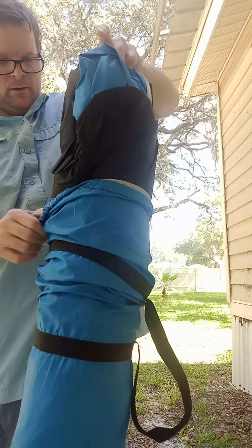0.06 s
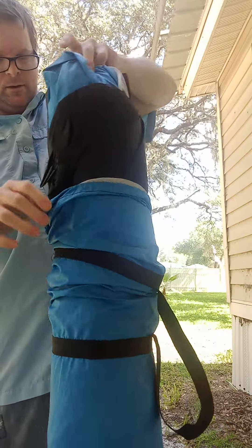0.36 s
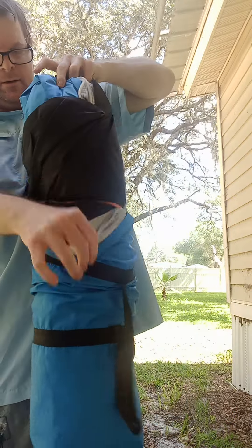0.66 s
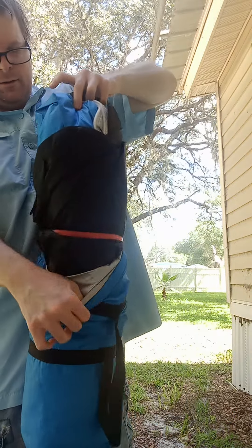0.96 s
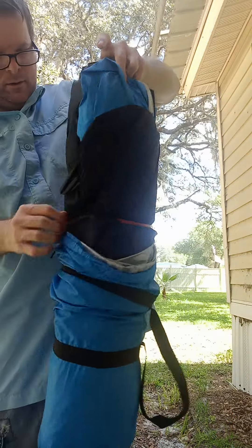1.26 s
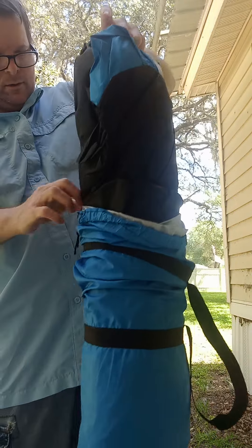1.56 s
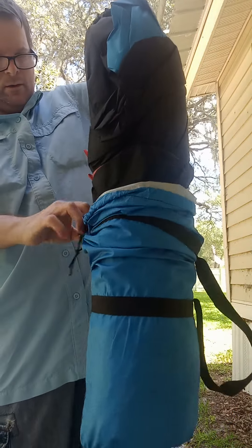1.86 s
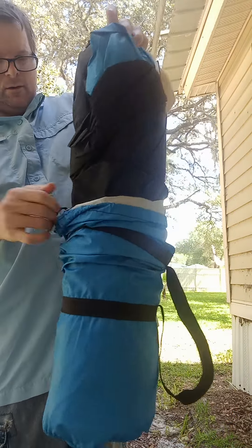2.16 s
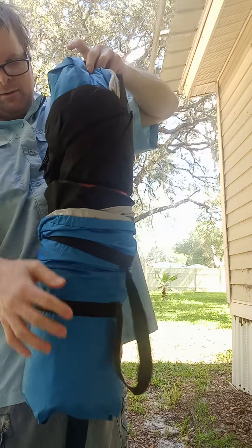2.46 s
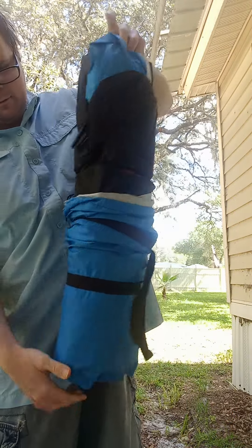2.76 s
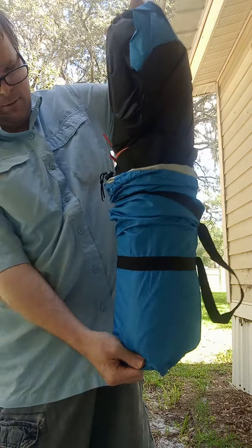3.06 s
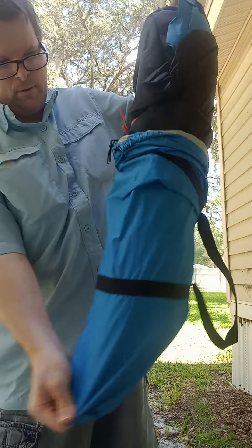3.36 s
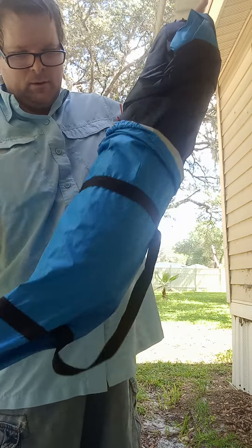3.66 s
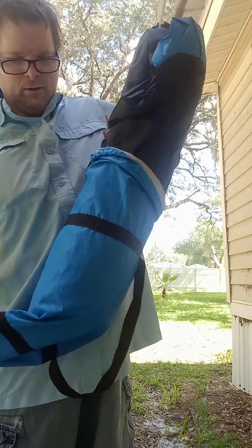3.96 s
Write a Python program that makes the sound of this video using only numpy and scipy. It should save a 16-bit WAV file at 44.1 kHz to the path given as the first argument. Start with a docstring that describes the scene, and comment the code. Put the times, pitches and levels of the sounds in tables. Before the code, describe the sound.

A nylon bag hisses and scrapes off a packed tent, close by outdoors, in short tugs with clicking creases through the first 1.2 seconds. The cloth cracks taut at 1.7, and a palm pats and brushes it at 2.5. The longest, loudest pull runs from 3.1 to 3.4, followed by lighter rustling until 4. Behind, a low engine drone speeds up and swells from about 1.8 over faint street rumble.

```python
"""Nylon hisses and scrapes in short slides as a carry bag is tugged off a packed tent outdoors.
Threads slip and catch, creases snap, hands pat the bag; it jerks taut once, a palm brushes down it,
and a long pull drags it loose, all answered by a short slap off the house wall.
Behind it an engine, probably a truck down the street, drones through its exhaust and gathers speed
over street rumble and faint outdoor air with a thin high hum and microphone hiss."""
import sys
import numpy as np
from scipy import signal
from scipy.fft import rfft, irfft, next_fast_len
from scipy.io import wavfile
from scipy.ndimage import map_coordinates

SR = 44100
rng = np.random.default_rng(int(sys.argv[2]) if len(sys.argv) > 2 else 0)


def put_to_file(sound):
    """Save the sound as 16-bit audio at rate SR, in the file named by the first command-line argument."""
    columns = np.atleast_2d(sound).T  # one column per channel
    safe = np.clip(columns, -1, 1)
    whole_steps = np.round(safe * 32767)
    wavfile.write(sys.argv[1], SR, whole_steps.astype(np.int16))


N = 176400

# fader moves of the bag sliding on the tent: time_s, hiss_db, scrape_db
SLIDE_LEVELS = [(0.0, -51, -74), (0.075, -57.5, -84), (0.11, -51, -62.5), (0.22, -46.5, -57.5),
                (0.28, -40, -50), (0.35, -43.5, -53.5), (0.42, -42.5, -56), (0.56, -41, -49),
                (0.62, -51, -53.5), (0.73, -42.5, -51), (0.8, -58, -63.5), (0.86, -48.5, -53),
                (0.93, -43, -54), (0.99, -51, -59.5), (1.06, -71, -81), (1.1, -51.5, -63),
                (1.15, -47.5, -59), (1.18, -61.5, -78), (1.22, -49, -63), (1.29, -68, -72), (1.4, -69, -67),
                (1.44, -57.5, -82), (1.52, -60, -72), (1.6, -51, -61), (1.68, -52.5, -61), (1.74, -42, -50),
                (1.79, -39, -51), (1.84, -61.5, -60.5), (1.91, -49.5, -65), (1.94, -56, -60),
                (2.0, -49.5, -62), (2.045, -46.5, -61), (2.072, -65.5, -72), (2.15, -70.5, -79),
                (2.31, -72, -95), (2.4, -57.5, -64.5), (2.72, -67, -67), (2.78, -56.5, -57.5),
                (2.86, -46, -53), (2.96, -52, -53.5), (3.085, -44.5, -47.5), (3.102, -35, -42.5),
                (3.19, -36, -43.5), (3.32, -32, -38.5), (3.38, -38.5, -48), (3.43, -48, -52.5),
                (3.49, -47.5, -52), (3.55, -41.5, -50), (3.61, -46.5, -52), (3.68, -51, -55.5),
                (3.77, -48.5, -50), (3.87, -49, -54.5), (3.95, -45, -47.5), (4.0, -52, -50.5)]
# high shelf riding on the hiss: time_s, gain_db
HISS_SHELF = [(0, -0.5), (.28, 0.5), (.45, -1.5), (.56, -3), (.68, -6), (.93, 0.5), (1.13, -0.5), (2.03, 0),
              (2.95, -3), (3.13, 0), (3.7, -.5)]
# tone curves of the cloth: freq_hz, gain_db
HISS_EQ = [(1200, -21), (2600, -3.5), (3300, -1.5), (5500, -3), (7400, -1), (8400, -8), (12000, -0.5),
           (15500, -6.5)]  # bright top of the slide
SCRAPE_EQ = [(150, -29), (270, -1), (480, -2.5), (900, -3.5), (1400, -3), (1800, -3.5), (2300, -7),
             (3000, -14), (6000, -28.5)]  # its lower scrape
BODY_EQ = [(100, -3.5), (170, -10), (270, 0), (330, -5.5), (420, -35), (800, -54)]  # broad body of the packed bag
RASP_EQ = [(1200, -43), (2000, 3), (2800, -1.5), (3600, -16), (6000, -8.5)]  # hard-pressed cloth
CRINKLE_EQ = [(400, -18), (1500, -0.5), (3000, 0), (7000, -4.5), (15000, -5)]  # tiny folds
CRACK_EQ = [(120, -8), (280, -3), (500, -8), (780, -26), (1050, 1.5), (1600, -2), (2500, 2), (7000, -2),
            (15000, -9.5)]  # cloth pulled taut
PALM_EQ = [(300, -0.5), (600, -3.5), (1150, -11), (1850, -1), (2200, -4), (2500, -5.5), (3200, -12),
           (3550, 2), (4200, -3), (7300, -1), (8400, -3.5), (15500, 0)]  # swish under the hand

# engine speed: time_s, firing_hz
ENGINE_SPEED = [(0, 62), (.25, 69.8), (.45, 69.6), (.7, 68.2), (1.08, 66.9), (1.31, 68.1), (1.49, 69.9),
                (1.83, 72.2), (2.05, 71.9), (2.32, 73.4), (2.55, 77.3), (2.72, 80), (3.33, 82.7),
                (3.45, 79.5), (3.52, 70.6), (3.65, 73.6), (3.85, 77), (4, 81)]
# engine load: time_s, firing_db, octave_db, lope_db
ENGINE_LOAD = [(0, -48, -68, -58), (.45, -46, -43.5, -45.5), (1.08, -39.5, -38, -49),
               (1.31, -43, -39.5, -46.5), (1.49, -49, -64, -51), (1.83, -33.5, -49.5, -39.5),
               (2.05, -34, -55.5, -39), (2.32, -28.5, -58, -41.5), (2.6, -27, -49, -43.5),
               (2.72, -22, -65, -42), (3.33, -21, -52, -40), (3.45, -21.5, -67, -42), (3.52, -30, -53, -37),
               (3.85, -28.5, -57, -43.5), (4, -29, -47, -41)]
# partials of the lope around the firing tone: multiple_of_cycle
LOPE_PARTIALS = [5, 7, 9, 10, 11, 13]
# their balance: gain_db
LOPE_MIX = [-4.5, 2.5, 0, -15, 0, -13.5]
# resonances of the exhaust: freq_hz, gain_db
EXHAUST_EQ = [(44, -16.5), (51, -2), (64, -16.5), (72, -5.5), (83, 3), (92, -12), (102, -2.5), (113, -22),
              (135, 6.5)]
# where the engine sits: time_s, left_minus_right_db
ENGINE_POSITION = [(0, 5), (1.5, 3), (2.3, 4.5), (4, 3)]
# tone curve of the street rumble: freq_hz, gain_db
STREET_EQ = [(25, -36), (42, -6.5), (62, 7.5), (90, 3), (115, 2.5), (170, -7.5), (300, -12.5), (420, -18.5),
             (700, -53)]
# tone curve of the outdoor air, its thin high hum and the microphone hiss: freq_hz, gain_db
AIR_AND_HISS_EQ = [(200, -4), (500, 1.5), (750, 0), (980, 2.5), (1200, -1), (1480, 2), (1660, 5),
                   (1950, -15), (2750, -27), (3150, -3), (3450, -16), (4000, -2.5), (5200, -13), (7200, -9),
                   (9000, -23), (12000, -8), (15000, -21)]

# creases snapping: start_s, level_db, centre_hz, width_ratio, t60_s
CREASE_SNAPS = [(0.0926, -35.5, 5000, 1.2, .014), (.287, -29, 1520, 0.41, 0.016),
                (0.3313, -28.5, 1710, 0.53, 0.02), (0.3947, -20.5, 4000, 2.2, .004),
                (0.4591, -15.5, 4960, 0.8, 0.0052), (0.6788, -28, 2200, 0.37, 0.01),
                (0.715, -25.5, 2080, 0.48, 0.0089), (0.7528, -24.5, 5600, 1.3, 0.012),
                (0.912, -30.5, 2660, 0.33, 0.0076), (1.0782, -39.5, 6500, 1.5, 0.067),
                (1.1892, -29.5, 12500, 0.56, 0.032), (1.1889, -34, 4430, 0.27, 0.018),
                (1.202, -36, 12200, .2, .015), (1.212, -34, 13500, 0.33, 0.022),
                (1.363, -38.5, 1500, 6.7, 0.038), (1.975, -35, 2430, 0.46, 0.0088),
                (2.756, -43, 7800, 1, 0.16), (3.006, -37, 4150, 0.26, 0.14),
                (3.0405, -29, 14200, 0.15, .012), (3.098, -23.5, 13800, 0.2, 0.034),
                (3.3158, -10.5, 5540, 0.23, 0.0059), (3.322, -16, 1500, 1, 0.015),
                (3.3415, -24, 2500, 1.2, 0.004), (3.609, -32, 10500, .5, .005),
                (3.694, -32, 1130, 0.45, 0.014), (3.733, -31, 3880, 0.71, 0.054),
                (3.753, -28, 8000, 2.1, 0.04), (3.767, -25, 12200, 0.2, 0.0088),
                (3.8078, -25, 6000, 1.7, 0.0049)]
# the weave zipping over a seam: start_s, length_s, pitch_hz, level_db
SEAM_ZIPS = [(0.128, 0.062, 610, -56.5), (3.769, 0.066, 4000, -47), (3.833, 0.044, 3900, -51)]
# hands patting the bag: start_s, level_db
HAND_PATS = [(1.349, -54), (2.486, -46), (3.234, -38.5)]
# the close-set hits of the one jerk: start_s, level_db
JERK_HITS = [(1.729, -35), (1.74, -22), (1.7438, -35)]
# modes of the stretched panel: pitch_hz, level_db, t60_s
PANEL_MODES = [(192, -11, 0.038), (285, -1.5, 0.024), (430, -17, 0.033)]

# how alike left and right are: freq_hz, correlation
STEREO_LIKENESS = [(60, 1), (290, 0.8), (640, 0.76), (1400, 0.5), (3100, 0), (15000, 0)]
# lean of the microphone pair: freq_hz, left_minus_right_db
MIC_BALANCE = [(60, -6), (140, -6.5), (280, -1), (780, -3), (1050, 1.5), (1800, 3), (2300, -1),
               (3300, -2.5), (7300, -8.5), (8200, -2), (9200, 1.5), (10300, -7), (12200, -10), (13500, 0),
               (15500, -6)]
# tone curve of both microphones: freq_hz, gain_db
MIC_EQ = [(7000, -0.5), (8300, -1), (10000, -2), (12000, 0), (14000, -4), (16000, -4.5)]


def amp(db):
    """Decibels to gain."""
    return 10 ** (np.asarray(db) / 20)


def unit_rms(x):
    """Scale to rms 1."""
    return x / np.sqrt(np.mean(x ** 2) + 1e-20)


def curve_at(points, hz):
    """Read a frequency curve on a log axis."""
    freqs, values = np.transpose(points)
    return np.interp(np.log(hz + 1), np.log(freqs + 1), values)


def automation(rows):
    """One lane, a value per sample, for each column after the time."""
    times, *lanes = np.transpose(rows)
    return [np.interp(np.arange(N) / SR, times, lane) for lane in lanes]


def wobble(per_s):
    """A smooth random curve with per_s knots a second."""
    return map_coordinates(rng.standard_normal(N // 100), [np.arange(N) * per_s / SR], mode="wrap")


def equalise(x, response):
    """Filter x by a gain given as a function of frequency."""
    size = next_fast_len(N + SR // 4)
    return irfft(rfft(x, size) * response(np.fft.rfftfreq(size, 1 / SR)), size)[..., :N]


def stereo_noise(eq, pair=None):
    """Shape two unrelated signals (white noise by default) to rms 1, narrow in the bass, wide on top."""
    def mid_side(hz):
        spread = np.arccos(np.clip(curve_at(STEREO_LIKENESS, hz), -1, 1)) / 2
        return amp(curve_at(eq, hz)) * [np.cos(spread), np.sin(spread)]
    pair = rng.standard_normal((2, N)) if pair is None else pair
    mid, side = equalise(pair, mid_side)
    return unit_rms(np.array([mid + side, mid - side]))


def resonate(x, hz, width):
    """One resonance that keeps the level of white noise; width is relative to its centre."""
    f = np.fft.rfftfreq(x.shape[-1], 1 / SR)
    gain = 1j * f / (hz * hz - f * f + 1j * f * hz * width)
    return irfft(rfft(x) * gain / np.sqrt(np.mean(np.abs(gain) ** 2)))


def decay(t, t60_s):
    """A tail that falls 60 dB in t60_s."""
    return np.exp(-np.log(1000) * t / t60_s)


def place(out, start_s, sound):
    """Mix a sound in at start_s."""
    part = out[:, round(start_s * SR):][:, :sound.shape[-1]]
    part += sound[..., :part.shape[1]]


def friction(eq, grain_db, catches_per_s=1500, spread_db=2.5):
    """Countless threads slip in a smooth wash, with sparser, larger catches as grain on top."""
    catches = rng.random(N) < catches_per_s / SR
    sizes = amp(spread_db * np.minimum(rng.exponential(size=N), 4))
    wash = rng.standard_normal((2, N))
    grain = unit_rms(catches * sizes * rng.standard_normal((2, N)))
    return stereo_noise(eq, wash + amp(grain_db) * grain)


def slide():
    """Nylon flutters as it drags over nylon: it rasps when pressed, and the packed bag rumbles along."""
    shelf_hz, firm_scrape_db, rasp_growth = 8000, -50, 1.22
    hiss_db, scrape_db = automation(SLIDE_LEVELS)
    shelf_db, = automation(HISS_SHELF)
    flutter_db = 1.5 * wobble(per_s=55)
    hiss = amp(hiss_db + 1 + flutter_db) * friction(HISS_EQ, grain_db=-11)
    hiss += (amp(shelf_db) - 1) * equalise(hiss, lambda hz: hz > shelf_hz)
    scrape = amp(-0.5) * friction(SCRAPE_EQ, grain_db=-6.5)
    body = amp(-6.5) * stereo_noise(BODY_EQ)
    rasp_db = -53 + rasp_growth * (scrape_db - firm_scrape_db) + 1.5 * wobble(per_s=29.74)
    rasp = amp(rasp_db) * friction(RASP_EQ, grain_db=-6.5)
    return hiss + rasp + amp(scrape_db + 0.76 * flutter_db) * (scrape + body)


def crinkles(folds_per_s=90):
    """Tiny creases fold at random, a fine crackle that rides the level of the hiss."""
    t = np.arange(SR // 100) / SR
    folds = (rng.random(N) < folds_per_s / SR) * rng.uniform(.3, 1, N)
    envelope = np.convolve(folds, decay(t, t60_s=0.0032))[:N]
    hiss_db, _ = automation(SLIDE_LEVELS)
    return amp(hiss_db - 9.5) * unit_rms(envelope * stereo_noise(CRINKLE_EQ))


def engine(cylinders=8, throb_s=2.073):
    """Only the lowest exhaust orders carry this far; one weak cylinder makes them throb once a cycle."""
    firing_hz, = automation(ENGINE_SPEED)
    firing_db, octave_db, lope_db = automation(ENGINE_LOAD)
    pan_db, = automation(ENGINE_POSITION)
    cycle = 2 * np.pi * np.cumsum(firing_hz) / SR / cylinders
    cycle -= cycle[round(throb_s * SR)]  # the partials line up here
    drone = amp(firing_db) * np.sin(cylinders * cycle) + amp(octave_db) * np.sin(2 * cylinders * cycle)
    for order, gain_db in zip(LOPE_PARTIALS, LOPE_MIX):
        exhaust_db = curve_at(EXHAUST_EQ, firing_hz * order / cylinders)
        drone -= amp(lope_db + gain_db + exhaust_db) * np.sin(order * cycle)
    return np.sqrt(2) * drone * amp(np.outer([.5, -.5], pan_db))


def street_and_air():
    """A wavering bed of street rumble and faint outdoor air with a thin high hum and microphone hiss."""
    rumble = amp(-46 + wobble(per_s=6.13)) * stereo_noise(STREET_EQ)
    air = amp(-64.5 + wobble(per_s=1.17)) * stereo_noise(AIR_AND_HISS_EQ)
    return rumble + air


def snaps(trim_db=-8):
    """Each crease buckles with one sharp, broadly tuned click and a short rustle."""
    out, t = np.zeros((2, N)), np.arange(4096) / SR
    click = amp(10.5) * (t == t[8])
    tail = amp(-19.5) * decay(t, t60_s=.07)
    for start_s, level_db, centre_hz, width, t60_s in CREASE_SNAPS:
        rustle = (decay(t, t60_s) + tail) * rng.standard_normal((2, len(t)))
        place(out, start_s, amp(level_db + trim_db) * resonate(click + rustle, centre_hz, width))
    return out


def zips():
    """Threads cross a seam at an even rate and give a brief, half-pitched scrape."""
    out, t = np.zeros((2, N)), np.arange(8192) / SR
    for start_s, length_s, pitch_hz, level_db in SEAM_ZIPS:
        swell = np.sin(np.pi * np.minimum(t / length_s, 1))
        buzz = resonate(rng.standard_normal((2, len(t))), pitch_hz, width=0.13)
        place(out, start_s, amp(level_db) * swell * buzz)
    return out


def bumps(attack_s=0.024, thud_s=.24, thud_hz=80):
    """Hands press and pat the packed bag: one deep thud at the first tug, then dull puffs of its body."""
    out, t = np.zeros((2, N)), np.arange(SR // 4) / SR
    swell = np.minimum(t / attack_s, 1) * decay(np.maximum(t - attack_s, 0), t60_s=0.16)
    place(out, thud_s, amp(-29) * swell * np.sin(2 * np.pi * thud_hz * t))
    for start_s, level_db in HAND_PATS:
        place(out, start_s, amp(level_db) * swell * stereo_noise(BODY_EQ)[:, :len(t)])
    return out


def jerk():
    """Slack cloth pulls taut: a crack over the dull thump of the stretched panel."""
    out, t = np.zeros((2, N)), np.arange(SR // 10) / SR
    thump = -sum(amp(db) * np.sin(2 * np.pi * hz * t) * decay(t, t60_s) for hz, db, t60_s in PANEL_MODES)
    for start_s, level_db in JERK_HITS:
        crack = stereo_noise(CRACK_EQ)[:, :len(t)] * decay(t, t60_s=0.022)
        place(out, start_s, amp(level_db) * (crack + thump))
    return out


def palm(start_s=2.479, attack_s=.028, hold_s=.088, release_db_per_s=376):
    """A palm brushes down the bag: a smooth swish, coloured by the hollow of the hand."""
    t = np.arange(N) / SR - start_s
    attack = np.clip(t / attack_s, 0, 1)
    release = amp(-release_db_per_s * np.maximum(t - attack_s - hold_s, 0))
    return amp(-37.5) * attack * release * stereo_noise(PALM_EQ)


def wall(x, predelay_s=.004):
    """The house wall and eaves answer with a short, diffuse slap."""
    t = np.arange(SR // 4) / SR
    tail = rng.standard_normal((2, len(t))) * decay(t, t60_s=.12) * (t > predelay_s)
    return signal.fftconvolve(x, tail / np.linalg.norm(tail[0]), axes=1)[:, :N]


def scene():
    """The bag up close with its slap off the wall, the street behind."""
    bag = slide() + crinkles() + palm() + zips() + snaps() + jerk() + bumps()
    return bag + amp(-11.5) * wall(bag) + engine() + street_and_air()


def record(dry, cutoff_hz=15950):
    """Two unlike microphone ports lean each band left or right, soften the top and cut it off."""
    def ports(hz):
        balance = amp(np.outer([.5, -.5], curve_at(MIC_BALANCE, hz)))
        balance /= np.sqrt(np.mean(balance ** 2, axis=0))
        return balance * amp(curve_at(MIC_EQ, hz)) * (hz < cutoff_hz)
    return equalise(dry, ports)


dry = scene()
out = record(dry)
put_to_file(out)
```